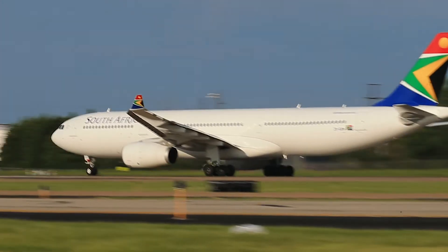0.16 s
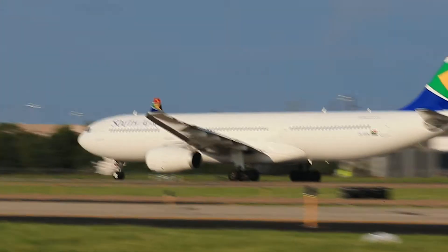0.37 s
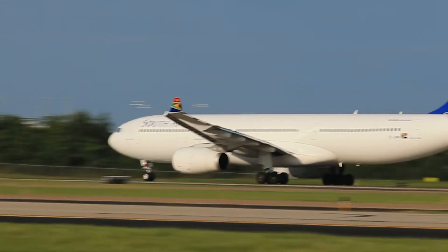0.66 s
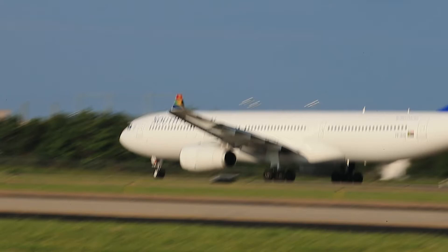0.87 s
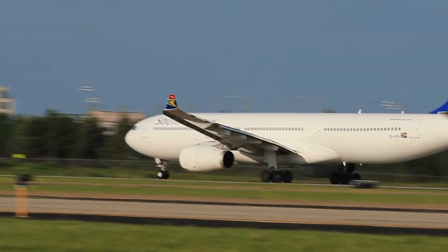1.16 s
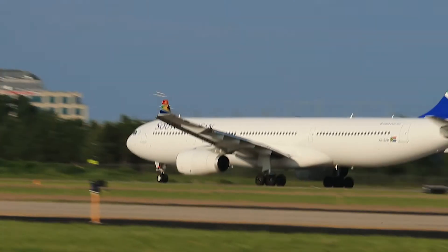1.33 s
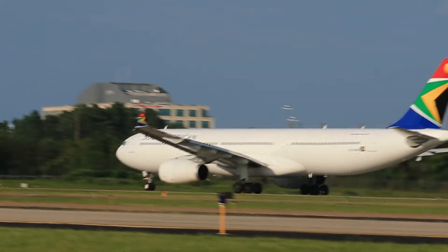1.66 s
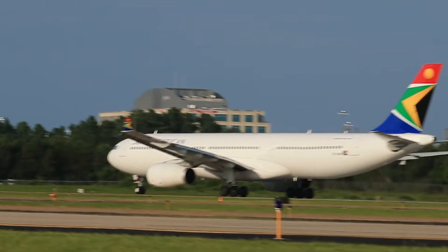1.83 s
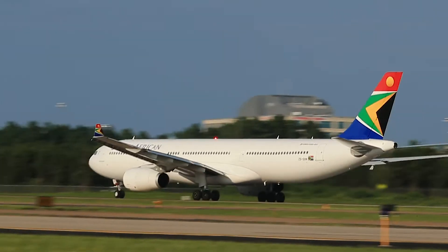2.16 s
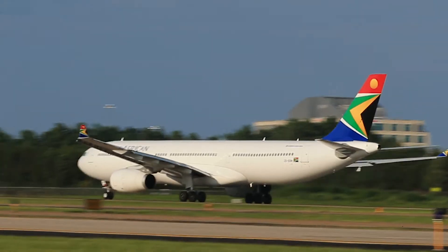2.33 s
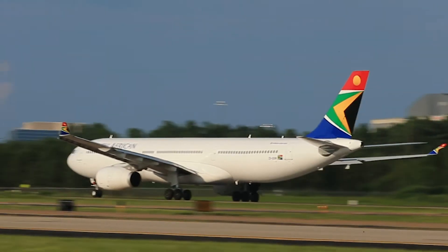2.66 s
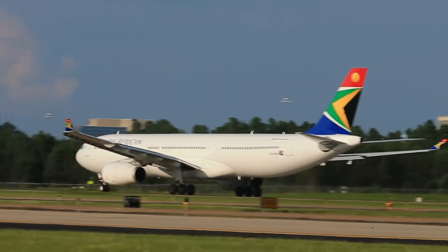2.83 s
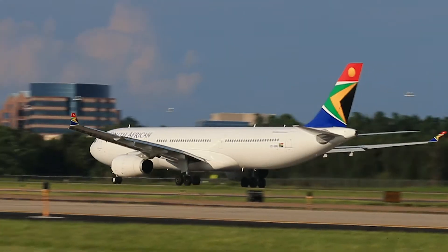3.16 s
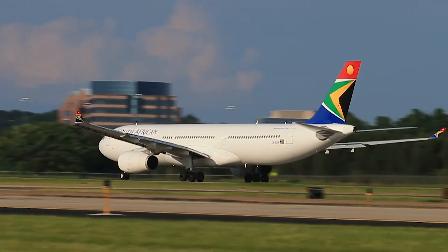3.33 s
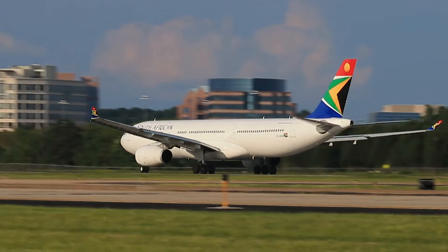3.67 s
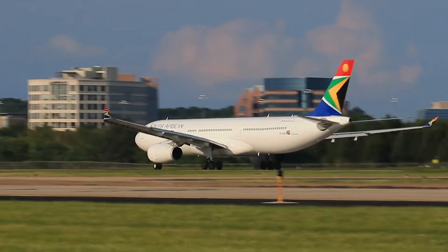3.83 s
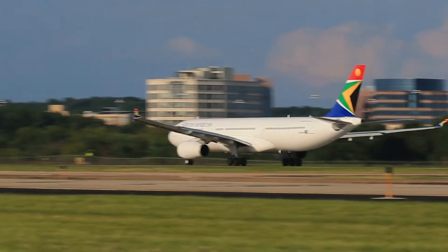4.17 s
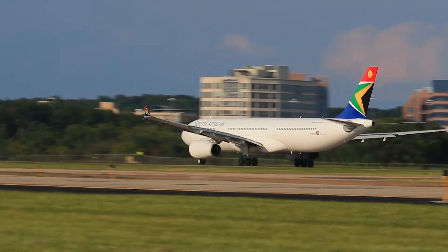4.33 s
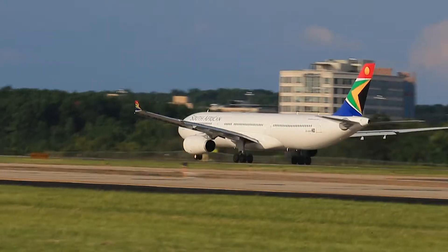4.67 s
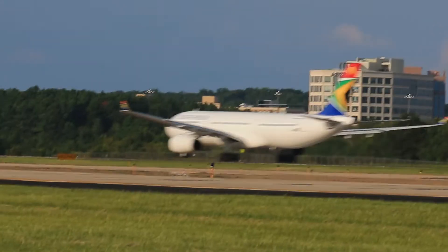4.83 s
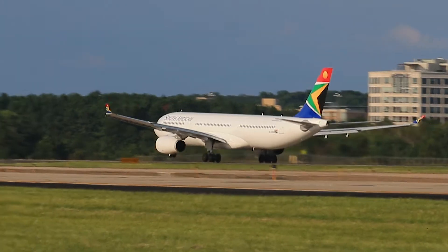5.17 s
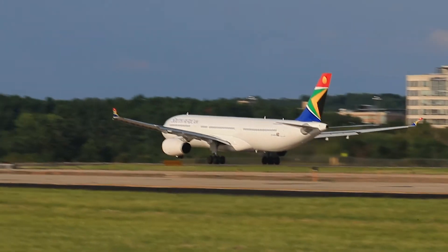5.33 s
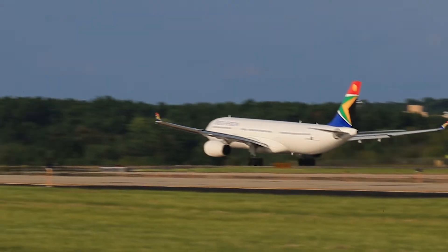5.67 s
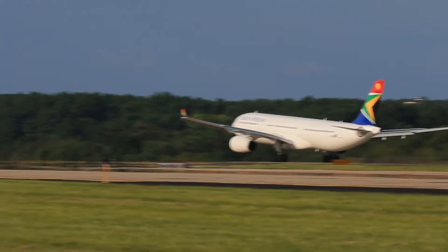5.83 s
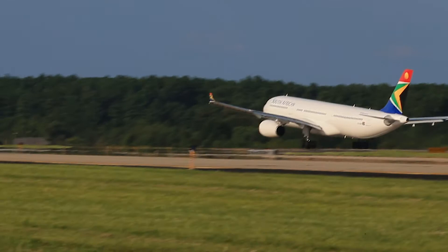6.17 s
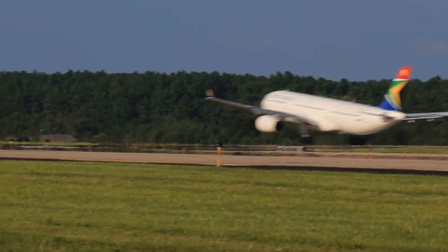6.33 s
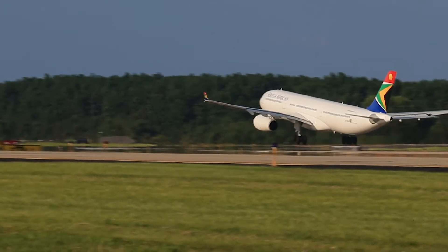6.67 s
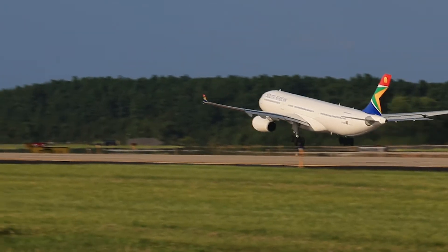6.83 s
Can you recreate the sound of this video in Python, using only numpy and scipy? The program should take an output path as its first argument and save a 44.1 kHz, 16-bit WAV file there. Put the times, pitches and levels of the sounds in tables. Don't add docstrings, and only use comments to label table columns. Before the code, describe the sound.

From beside a runway, a twin-engine airliner at takeoff power rolls past and away. A heavy, lumpy exhaust rumble dominates and grows deeper, under a broad rushing roar that drifts with the air. A faint high fan whine twinkles in the first moments and fades. Close by, a stills camera fires several quick mechanical clicks, one hard plastic snap comes just past the middle, and faint insects chirp over light hiss.

```python
import sys
import numpy as np
from scipy import signal
from scipy.fft import rfft, irfft, next_fast_len
from scipy.io import wavfile
from scipy.ndimage import uniform_filter1d, map_coordinates

SR = 44100
rng = np.random.default_rng(int(sys.argv[2]) if len(sys.argv) > 2 else 0)


def magnitude_from_level(level_db):
    exponent = np.asarray(level_db, float) / 20
    return 10 ** exponent


def master_out(mix):
    frames = np.transpose(np.atleast_2d(mix))
    ceiling = np.clip(frames, -1, 1)
    pcm = np.round(ceiling * 32767).astype(np.int16)
    wavfile.write(sys.argv[1], SR, pcm)


N = 308700
TIME = np.arange(N) / SR

# time_s, tail_facing_us_0_to_1
TAIL_TURN = [(0, 0.26), (.5, 0.05), (1, 0.41), (2, 0.51), (3, 0.65), (4, 0.77), (5, 0.97), (5.8, 0.97),
             (6.3, 0.97), (7, 0.84)]


def unit(x):
    return x / np.sqrt(np.mean(x ** 2) + 1e-20)


def along(points, hz):
    f, v = np.transpose(points)
    return np.interp(np.log(hz + 1), np.log(f + 1), v)


def curves(rows, t=TIME):
    s, *cols = np.transpose(rows)
    return [np.interp(t, s, c) for c in cols]


def wobble(knots_per_s):
    knots = rng.standard_normal(int(N * knots_per_s / SR) + 4)
    return map_coordinates(knots, [TIME * knots_per_s])


def filtered(x, response):
    m = next_fast_len(len(x) + 8192)
    return irfft(rfft(x, m) * response(np.fft.rfftfreq(m, 1 / SR)), m)[:len(x)]


def peak(f, hz, width_hz):
    return 1j * f * width_hz / (hz * hz - f * f + 1j * f * width_hz)


def noise_band(hz, width_hz):
    return unit(filtered(rng.standard_normal(N), lambda f: peak(f, hz, width_hz) ** 2))


def rush(spectrum, patchy_db):
    z = signal.stft(rng.standard_normal(N), nperseg=512)[2]
    field = uniform_filter1d(rng.standard_normal(z.shape), size=5, axis=0)
    field = uniform_filter1d(field, size=16, axis=1)
    x = signal.istft(z * magnitude_from_level(patchy_db * unit(field)), nperseg=512)[1][:N]
    return unit(filtered(x, lambda hz: magnitude_from_level(along(spectrum, hz))))


def swells(rest_db, rows):
    bells = [magnitude_from_level(db) * np.exp(-.35 * ((TIME - s) / half_s) ** 2) for s, db, half_s in rows]
    return np.maximum.reduce([magnitude_from_level(rest_db)] + bells)


def exhaust():
    # freq_hz, level_db_per_hz
    abeam = [(11, -61), (18, -36.5), (48, -13.5), (81, 3.5), (101, -1.5), (141, 0), (169, -2), (236, -5),
             (279, -11), (500, -31), (650, -56.5), (1100, -120)]
    astern = [(11, -44.5), (18, -25.5), (39, -6), (87, -2), (133, -6), (208, -27), (279, -39.5), (312, -44),
              (339, -47.5), (363, -52), (500, -44), (650, -78.5), (1100, -120)]
    # time_s, level_db, half_length_s
    booms = [(0.176, -15, 0.045), (0.397, -15.5, 0.075), (0.67, -14, 0.055), (0.878, -12.5, 0.029),
             (1.228, -14.5, 0.068), (1.416, -13.2, 0.087), (1.524, -19, 0.02), (1.807, -14.6, 0.032),
             (2.128, -13, 0.06), (2.298, -13.5, 0.027), (2.49, -12.5, 0.02), (2.632, -12, 0.045),
             (3.044, -11.5, 0.08), (3.428, -10.5, 0.015), (3.705, -13, 0.039), (3.897, -12.5, 0.067),
             (4.209, -13, 0.061), (4.407, -7.5, 0.013), (4.684, -9.5, 0.034), (4.923, -12.5, 0.028),
             (5.1, -11.5, 0.085), (5.468, -9, 0.022), (5.692, -12, 0.028), (5.83, -13.5, 0.023),
             (6.196, -12.5, 0.053), (6.452, -13.5, 0.091), (6.669, -8, 0.015), (6.891, -7, 0.024)]
    # time_s, level_db, half_length_s
    barks = [(0.675, -17.5, 0.08), (0.856, -18.5, 0.034), (1.859, -18.0, 0.04), (2.172, -18.0, 0.068),
             (2.636, -18, 0.053), (3.061, -17.5, 0.026), (3.29, -20.6, 0.03), (3.692, -21, 0.029),
             (4.02, -18, 0.031), (4.13, -22, 0.053), (4.41, -21.8, 0.028), (4.583, -18, 0.034),
             (4.7, -21.5, 0.045), (5.063, -20.5, 0.041), (5.211, -21.5, 0.044), (5.505, -20, 0.095),
             (5.801, -16, 0.022), (6.128, -17, 0.037), (6.272, -19.5, 0.083), (6.429, -19, 0.098)]
    hz, t, z = signal.stft(rng.standard_normal((2, N)), SR, nperseg=8192)
    rear = np.clip(curves(TAIL_TURN, t)[0], 0, 1)
    colour_db = np.outer(along(abeam, hz), 1 - rear) + np.outer(along(astern, hz), rear)
    throaty_share = (hz ** 8 / (hz ** 8 + 125. ** 8))[:, None]
    z = z * magnitude_from_level(colour_db) * np.sqrt([1 - throaty_share, throaty_share])
    eddies = signal.istft(z, SR, nperseg=8192)[1][:, :N]
    power = uniform_filter1d(uniform_filter1d(eddies ** 2, size=3500), size=3500)
    deep, throaty = eddies / np.sqrt(np.abs(power) + 1e-20)
    rear, = curves(TAIL_TURN)
    out = np.zeros(N)
    for layer, side_db, rear_db, rows in [(deep, -18, -17.5, booms), (throaty, -18, -24, barks)]:
        churn_db = 1 * wobble(8.3)
        out += layer * swells(side_db + (rear_db - side_db) * rear + churn_db, rows)
    return out


def bypass():
    # freq_hz, level_db_per_hz
    growl = [(160, -25.5), (280, -1.5), (400, -1.5), (600, -3.5), (760, -10), (1000, -33.5), (1500, -93)]
    roar = [(400, -55.5), (600, -3.5), (750, 0.5), (1000, 0.5), (1300, -0.5), (1600, -18.5), (2200, -33),
            (3500, -100)]
    rasp = [(820, -28), (1400, 1), (3360, -8), (3590, -9.5), (4370, -28), (5680, -48.5), (9610, -120)]
    edge = [(3000, -38), (4100, -2), (4400, -9), (4800, -11), (5400, -17.5), (6200, -24), (7500, -35.5),
            (10000, -91)]
    # time_s, level_db, brightness_db
    carry = [(0, -31.5, 0), (.38, -29, 0), (.56, -34, 0.5), (.97, -34, 0), (1.45, -34, 1), (2.05, -34.5, 0),
             (2.35, -35.5, 0), (2.8, -36.5, 0), (3.3, -33.5, -1.5), (3.8, -34, 0), (4.3, -32.5, 1),
             (4.84, -36.5, 0), (5.87, -36, 0), (6.1, -31.5, 0.5), (6.36, -30.5, 0.5), (6.6, -32.5, -0.5),
             (6.86, -28, 0), (7, -28.5, -2.5)]
    # level_db, carry_share, brightness_share, side_to_rear_db, patchiness_db, gust_share
    layers = [
        (-37, 0.66, -1, -1, 1.56, 0.52),
        (-36, 0.9, -0.61, -1, 1.7, 0.58),
        (-37, 0.94, 0.86, -1.5, 0.48, 1.6),
        (-55, .7, 1, -14, 2.7, 1.3),
    ]
    carry_db, bright_db = curves(carry)
    carry_db = carry_db - carry_db.mean()
    rear, = curves(TAIL_TURN)
    gusts_db = 0.49 * wobble(12) + 0.32 * wobble(30)
    out = np.zeros(N)
    for spectrum, layer in zip([growl, roar, rasp, edge], layers):
        db, carry_share, bright_share, turn_db, patchy_db, gust_share = layer
        level_db = db + carry_share * carry_db + bright_share * bright_db
        level_db = level_db + turn_db * rear + gust_share * gusts_db
        out += magnitude_from_level(level_db) * rush(spectrum, patchy_db)
    return out


def fan():
    # time_s, pitch_hz
    blade_hz = [(0, 2564), (.15, 2552), (.6, 2545), (2.6, 2534)]
    # time_s, level_db, half_length_s
    glints = [(.047, -35, .011), (.09, -35, .008), (.17, -34.5, .013), (.205, -42, .005), (.238, -35, .011),
              (.285, -43, .01), (.325, -35, .009), (.365, -37, .016), (.42, -41, .014), (.47, -45, .01),
              (.52, -43, .01), (.62, -45, .01), (.8, -47, .03), (1.82, -49, .04)]
    hz = curves(blade_hz)[0] + 6 * wobble(30)
    fade_db_per_s, hide_db_per_s, hidden_s = 4, 8.5, 2.6
    rest_db = -51 - fade_db_per_s * TIME - hide_db_per_s * np.maximum(TIME - hidden_s, 0)
    rest_db = rest_db + 3 * wobble(22)
    tone = np.sqrt(2) * np.sin(2 * np.pi * np.cumsum(hz) / SR)
    return swells(rest_db, glints) * tone


def hiss():
    # freq_hz, level_db_per_hz
    hiss_spectrum = [(200, -28), (3000, -9.5), (6000, -0.5), (8000, 3), (11000, 1), (14000, 1),
                     (15500, 1.5), (17000, -12)]
    # time_s, level_db
    hiss_level = [(0, -84), (7, -77)]
    return magnitude_from_level(curves(hiss_level)[0] + 5) * rush(hiss_spectrum, patchy_db=-0.8)


def focusing():
    # time_s, half_length_s, freq_hz, width_hz, level_db
    focus = [(.3, .2, 330, 130, -33), (4.86, .05, 4900, 120, -69), (0.303, 0.16, 1140, 295, -37.5),
             (1.49, 0.039, 2600, 120, -42), (2.05, 0.074, 324, 130, -34.5), (1.8, .04, 2400, 60, -46),
             (3.75, 0.34, 830, 219, -39), (4.397, 0.076, 1560, 200, -42.5),
             (6.403, 0.091, 1510, 399, -37.5)]
    out = np.zeros(N)
    for s, half_s, hz, width_hz, db in focus:
        out += magnitude_from_level(db) * np.exp(-((TIME - s) / half_s) ** 2) * noise_band(hz, width_hz)
    return out


def insects():
    # freq_hz, width_hz, level_db, period_s, chirp_s
    singers = [
        (7950, 150, -82.5, .0402, .012),
        (9450, 300, -83, .328, .048),
        (10150, 300, -81.5, .241, .048),
        (8900, 300, -82, .46, .045),
    ]
    # singer_index, first_chirp_s, end_s
    bouts = [(0, 2.3, 5.2), (1, .63, 3.7), (1, 4.12, 4.5), (1, 5.72, 6.1), (2, 2.83, 3.15), (2, 3.5, 4),
             (2, 4.29, 4.6), (2, 5.07, 6.9), (3, 4.93, 6.4)]
    wing_strokes = 1 + np.sin(2 * np.pi * 120 * TIME)
    out = np.zeros(N)
    for singer, start_s, end_s in bouts:
        hz, width_hz, db, period_s, chirp_s = singers[singer]
        off_beat_s = ((TIME - start_s) / period_s + .5) % 1 * period_s - period_s / 2
        chirps = np.exp(-2 * (off_beat_s / chirp_s) ** 2)
        sings = (TIME > start_s - chirp_s) * (TIME < end_s)
        out += magnitude_from_level(db + wobble(3)) * noise_band(hz, width_hz) * chirps * sings * wing_strokes
    return out


def camera():
    # time_s, level_db, tilt_db_per_octave
    shots = [(1.63, -54.5, -5), (2.4772, -52, -5.5), (3.7387, -51, 0), (4.4012, -49, 1),
             (6.1155, -48.5, 0.5), (6.613, -50.5, -2.5), (6.8635, -49, 0)]
    # after_shutter_s, level_db, t60_s
    cycle = [(-.062, -7, .012), (-.048, -13.5, .01), (-.034, -10.5, 0.0065), (0, 0.5, .012),
             (.003, -2.5, .014), (.030, -7, 0.0092), (.038, -11.5, .01), (.047, -11, .01),
             (.074, -16, 0.011)]
    # freq_hz, width_hz, level_db
    body = [(5740, 530, -7.5), (7980, 400, 3), (11100, 810, -10.5), (13200, 1000, -7)]
    # from_s, to_s (after shutter), level_db
    gears = [
        (-.062, -0.037, -19),
        (0, .078, -17),
    ]
    gear_edge_s, gear_idle_db, gear_top_hz, gear_sizzle = .005, -31.5, 9500, 0.26

    def gear_colour(f):
        return gear_sizzle + 1 / (1 + (f / gear_top_hz) ** 6)

    def shell(f):
        modes = sum((-1) ** k * magnitude_from_level(db) * peak(f, hz, width) for k, (hz, width, db) in enumerate(body))
        return magnitude_from_level(-7.5) / (1 + (f / 13500) ** 6) + modes

    lead = SR // 10
    t = np.arange(-lead, SR // 5) / SR
    runs = magnitude_from_level(gear_idle_db) * (np.abs(t) < .06)
    for from_s, to_s, db in gears:
        runs = runs + magnitude_from_level(db) * np.clip(np.minimum(t - from_s, to_s - t) / gear_edge_s + 1, 0, 1)
    out = np.zeros(N)
    for s, db, tilt_db in shots:
        teeth_db = 2.5 * rng.standard_normal(len(t) // 40 + 1).repeat(40)[:len(t)]
        whirr = filtered(runs * magnitude_from_level(teeth_db) * rng.standard_normal(len(t)), gear_colour)
        force = np.zeros(len(t))
        for lag_s, level_db, t60_s in cycle:
            age_s = t - lag_s - 0.00061 * rng.standard_normal()
            decay_db = level_db + rng.normal(0, 1.5) - 60 * np.abs(age_s) / t60_s
            force += magnitude_from_level(decay_db) * (age_s >= 0)

        def tilt(f):
            return magnitude_from_level(tilt_db * np.log2(np.maximum(f, 5000) / 8000)) * f ** 4 / (f ** 4 + 4100.0 ** 4)

        sound = filtered(force * rng.standard_normal(len(t)) + whirr, lambda f: shell(f) * tilt(f))
        part = out[round(s * SR) - lead:][:len(t)]
        part += magnitude_from_level(db + 12.5) * sound[:len(part)]
    return out


def snap():
    # time_s, level_db
    snaps = [(4.0649, -15.5)]
    # freq_hz, level_db, t60_s
    modes = [(1150, -9, .008), (1620, -6, .014), (2250, 0, .02), (3000, -5, .008), (3900, -6, .009),
             (5100, -12, .008), (6240, -15, .009), (7310, -8, .008), (8420, -14, .012), (10000, -14, .005),
             (11600, -9, .013), (13400, -9, .006), (15100, -16, .007)]
    t = np.arange(SR // 20) / SR
    onset = 1 - np.exp(-t / .00006)
    out = np.zeros(N)
    for s, db in snaps:
        ring = sum(magnitude_from_level(g - 60 * t / t60_s) * np.sin(2 * np.pi * hz * t) for hz, g, t60_s in modes)
        crack_gain = .55 * magnitude_from_level(-60 * t / .006) + .6 * magnitude_from_level(-60 * t / .002)
        crack = crack_gain * rng.standard_normal(len(t))
        out[round(s * SR):][:len(t)] += magnitude_from_level(db) * (ring + crack) * onset
    return signal.sosfilt(signal.butter(4, 13800, fs=SR, output="sos"), out)


def scene():
    aircraft = exhaust() + bypass() + fan() + focusing()
    return (aircraft + insects() + camera() + snap())[None]


def band_limit(x):
    return signal.sosfilt(signal.butter(12, 15830, fs=SR, output="sos"), x)


def record(dry):
    x = filtered(dry[0], lambda f: 1j * f / (24 + 1j * f))[None]
    x = x + hiss()
    x = x / (1 + np.abs(x / 1.02) ** 6) ** (1 / 6)
    return band_limit(x)


dry = scene()
out = record(dry)
master_out(out)
```